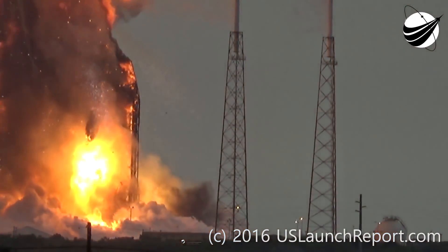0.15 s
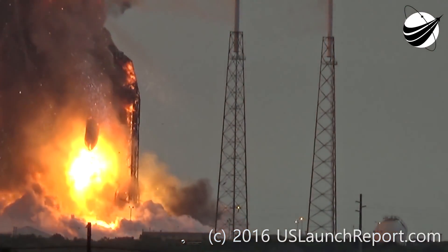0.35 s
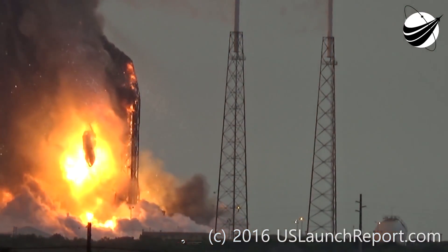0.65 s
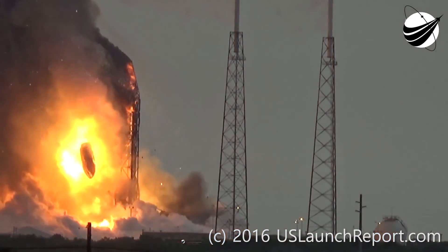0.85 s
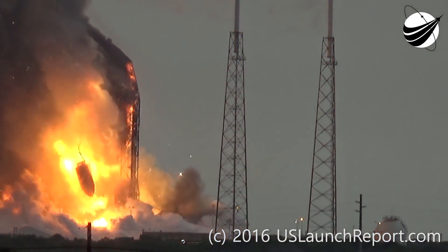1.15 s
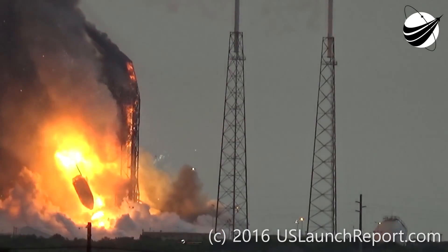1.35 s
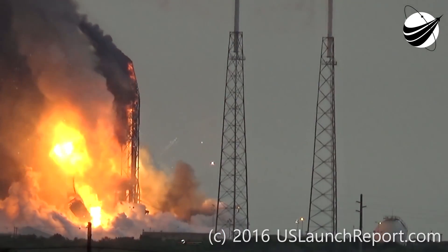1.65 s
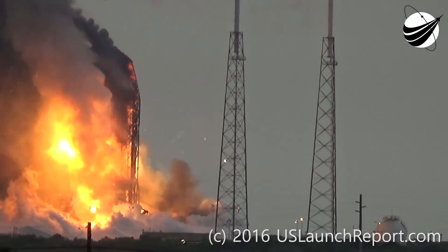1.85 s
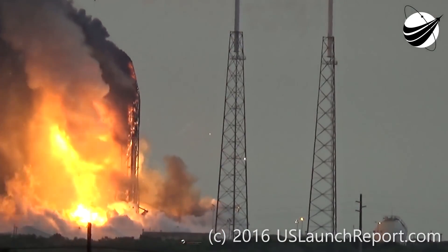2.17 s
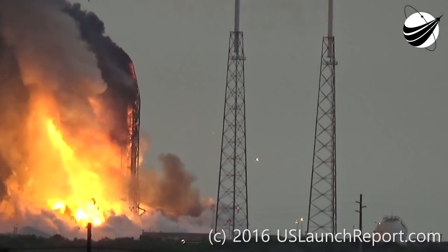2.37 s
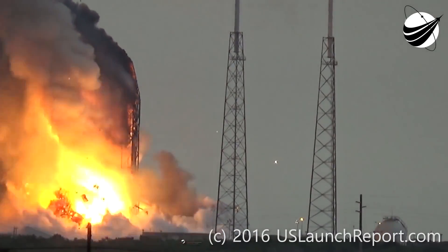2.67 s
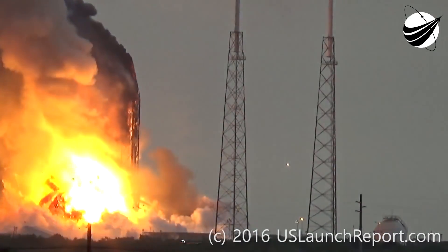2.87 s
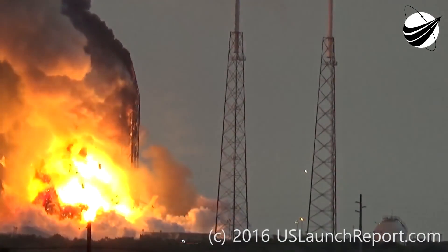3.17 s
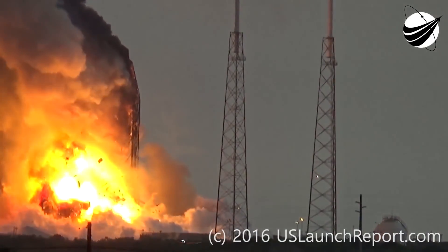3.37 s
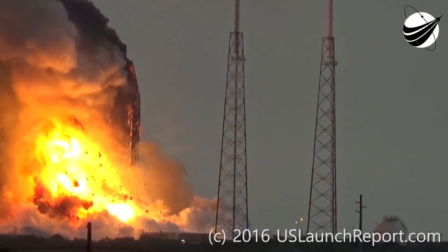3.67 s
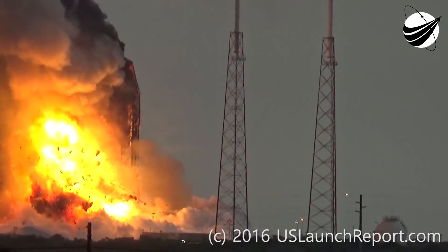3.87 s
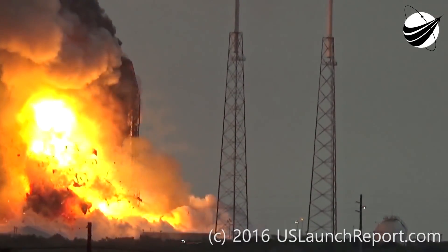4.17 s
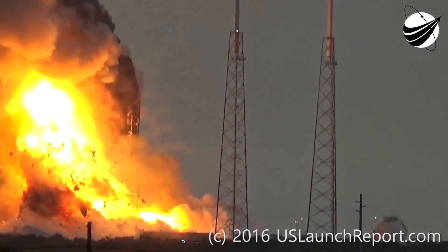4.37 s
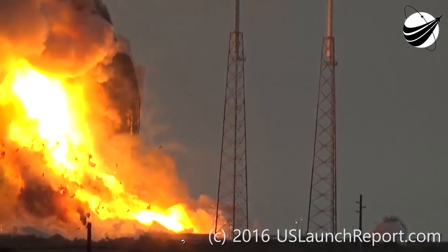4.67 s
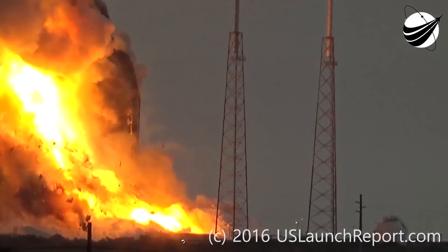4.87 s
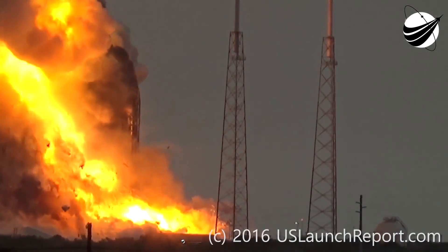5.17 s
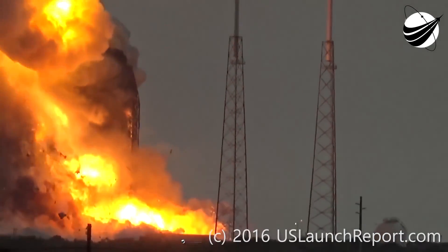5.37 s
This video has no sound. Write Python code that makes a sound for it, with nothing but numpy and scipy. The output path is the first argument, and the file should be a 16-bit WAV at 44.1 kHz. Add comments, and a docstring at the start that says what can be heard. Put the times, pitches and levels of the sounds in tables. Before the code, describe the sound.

The sound starts in mid-roar: heavy low booms and puffs from a distant burning rocket, easing into uneven rumbling. Three explosions snap out, the middle one brightest, each trailing rough noisy echoes. Between them the fire keeps rolling. Quiet hiss, light ticking, a short rough animal-like squawk and thin insect bands lie close to a small camera microphone outdoors, which distorts at the peaks.

```python
"""Far fuel fire with blasts

A far fuel fire rolls, booms and puffs (shaped noise) across flat open ground, with sharp blasts (pressure
jumps) and their bright echoes (swelling noise). The sound grazes the ground on its way to a two-port camera
microphone, whose level dips and whose input overloads. Nearby, insects hiss (bands of noise), the camera
motor likely ticks (short tones), a few blips sound and something squawks once (rough tone through a throat)."""
import sys
import numpy as np
from scipy import signal
from scipy.fft import rfft, irfft, next_fast_len
from scipy.io import wavfile
from scipy.ndimage import uniform_filter1d

SR = 44100
rng = np.random.default_rng(int(sys.argv[2]) if len(sys.argv) > 2 else 0)


def inscribe(sig):
    """Save sig as 16-bit PCM at rate SR to the path in sys.argv[1].

    A 1-D sig is mono; a 2-D sig holds one channel per row.
    Samples are clipped to [-1, 1] before scaling.
    """
    pcm = np.round(np.clip(np.atleast_2d(sig).T, -1, 1) * 32767)
    wavfile.write(sys.argv[1], SR, pcm.astype(np.int16))


N = 243873  # samples in the scene


def fire():
    """Turbulent burning: three ranges of eddy size, the finest made lumpy by small pops."""
    # Noise colours, from the deep roll up to the rattle near 1 kHz. Each row: frequency in Hz, dB per Hz.
    deep_colour = [(15, -56), (25, -39.5), (52, -42), (70, -24.5), (100, -14.5), (127, -3), (155, 1.5),
                   (178, -2), (198, -1.5), (220, -6.5), (247, -24.5), (270, -26.5), (350, -49), (590, -120)]
    upper_colour = [(60, -52), (150, -15), (250, -10), (312, -2.5), (413, 2), (483, -6), (532, -23.5),
                    (560, -16.5), (730, -23), (1230, -120)]
    rattle_colour = [(100, -37), (320, 3.5), (540, -3), (739, 4), (823, -0.5), (899, -2.5), (975, -8.5),
                     (1070, -9.5), (1130, -15), (1220, -10.5), (1310, -25.5), (1350, -18), (1760, -25),
                     (2970, -120)]
    # Slow air pressure of the big rolls. Each row: frequency in Hz, dB per Hz.
    push_colour = [(10, -36), (20, 2), (35, 4), (52, -1), (70, -5.5), (100, -30), (300, -100)]
    # Steady burning under the booms. Each row: time in seconds, then deep roll, upper roll and rattle in dB.
    burning = [(0, -14, -17, -36), (.5, -34, -26.5, -39), (1.8, -30, -31, -41), (2.4, -27, -21, -37),
               (3.3, -32, -25.5, -32.5), (4.1, -32, -28, -35.5), (4.7, -28, -27.5, -38),
               (5.53, -29.5, -34, -39.5)]
    # Booms of the fireball. Each row: time of the top, rise and fall in seconds (each spans 20 dB),
    # then deep roll, upper roll and rattle at the top in dB.
    booms = [ (0.063, 0.022, .06, -15, -11, -32.5), (0.091, .05, 0.13, -4, -18, -26),
             (0.141, 0.031, 0.15, -8, -10.5, -29.5), (.21, .1, 0.054, -12, -32, -30),
             (.283, .08, 0.15, -17.5, -32, -33.5), (0.379, 0.034, 0.28, -4.5, -12.5, -27.5),
             (.43, 0.12, 0.25, -12.5, -18.5, -37.5), (0.664, .12, 0.37, -8.5, -18, -30.5),
             (.88, 0.04, 0.23, -16, -25, -41), (1.118, 0.16, 0.11, -12, -21, -41),
             (1.207, 0.036, 0.2, -11.5, -22, -36), (1.29, 0.11, 0.15, -12.5, -23.5, -53),
             (1.47, 0.22, 0.043, -12, -19, -40), (1.59, 0.2, .3, -20, -26, -43),
             (1.74, 0.23, 0.041, -14, -39, -43), (1.8, 0.044, 0.14, -19, -21, -38),
             (1.865, 0.13, .1, -20.5, -25, -49), (1.925, .05, 0.27, -12.5, -23.5, -38),
             (2.04, 0.18, 0.19, -13.5, -22.5, -50), (2.078, .015, 0.054, -5, -11.5, -34),
             (2.09, .012, 0.29, -6, -8.5, -14.5), (2.19, 0.15, 0.047, -14, -11, -32),
             (2.258, 0.029, 0.076, -16, -23, -32), (2.396, 0.082, 0.35, -9, -20, -28),
             (2.552, 0.22, 0.069, -12.5, -18, -46), (2.665, .012, 0.33, -7.5, -9, -14.5),
             (2.76, 0.13, 0.27, -9, -13.5, -29), (2.835, 0.17, 0.16, -7, -14.5, -20.5),
             (2.95, .2, 0.6, -13.5, -20.5, -24.5), (3.06, 0.14, 0.23, -15, -26, -37),
             (3.17, 0.1, 0.048, -15, -37, -39), (3.255, 0.029, 0.19, -21, -26.5, -34),
             (3.44, 0.13, 0.084, -19, -25.5, -43), (3.527, 0.12, 0.048, -15, -28, -32),
             (3.671, 0.11, 0.13, -16.5, -32, -31), (3.849, .11, 0.25, -17, -25.5, -35),
             (4.081, 0.12, 0.074, -12.5, -17.5, -30.5), (4.195, 0.18, 0.094, -18.5, -24.5, -34),
             (4.224, .005, 0.17, -4.5, -8, -13.5), (4.325, 0.041, 0.49, -6, -9, -21),
             (4.479, 0.048, 0.28, -8, -15, -23.5), (4.759, 0.3, 0.022, -14, -24.5, -38),
             (4.827, 0.028, 0.39, -15.5, -26, -33.5), (4.915, 0.15, 0.38, -13, -17, -32.5),
             (5.103, 0.097, 0.16, -12, -21.5, -35.5), (5.17, 0.087, 0.053, -26, -18, -46),
             (5.215, 0.023, 0.21, -20, -33, -38.5), (5.27, 0.097, 0.47, -17.5, -22.5, -50),
             (5.445, 0.043, 0.16, -18, -21, -31.5)]
    levels_db = []
    for bed_db, boom_db in zip(follow(burning), swells_db(booms)):
        levels_db.append(10 * np.log10(amp(2 * bed_db) + amp(2 * boom_db)))  # the powers add
    deep_db, upper_db, rattle_db = levels_db
    deep = amp(deep_db) * steadied(noise(deep_colour), 970, 0.42)
    upper = amp(upper_db) * steadied(noise(upper_colour), 1100, 0.16)
    push = amp(1.85 * upper_db - 9.5) * noise(push_colour)  # grows faster than the upper roll
    rattle = amp(rattle_db + 1.06 * lumps()) * walled(noise(rattle_colour))
    return deep + upper + push + rattle


def blasts():
    """Each front is a jump that swings negative, torn by turbulent air into a few milliseconds of crack."""
    # Shock fronts before colouring. Each row: start in seconds, peak in dB, time to swing negative in ms,
    # crack level in dB over the front, crack length in ms, upper treble edge in Hz.
    shocks = [(2.081, -11, 1.1, -9, 3.5, 6000), (2.085, -1.5, 0.39, -12.5, 5.5, 4020),
              (2.091, -7.5, 1.4, 0.5, 6.2, 4400), (2.246, -20, 1.2, -12, 6.7, 2500),
              (2.391, -39, 1.1, -9, 9.2, 2000), (2.6602, -8.5, 2.3, 1.5, 4.7, 5000),
              (2.667, 3.5, 0.57, -7, 3.3, 9200), (4.222, -5, 0.81, -16.5, 3, 1500),
              (4.233, -22.5, 0.91, -2, 9.5, 2500), (4.238, -2.5, 1.2, -11.5, 8.2, 3470),
              (4.241, -13.5, 0.7, -10, 17, 3900), (4.252, -14.5, 1.1, -4, 2, 6000),
              (4.309, -15.5, 0.59, -10, 7.4, 1800), (4.325, 0, 1.3, -17.5, 4.5, 3450),
              (4.328, -6, 0.68, -16, 3.3, 4500)]
    # Colour given by ground and camera body. Each row: frequency in Hz, gain in dB.
    front_colour = [(30, 1.5), (150, 16.5), (260, -3.5), (400, 2), (1000, 4), (2000, 3), (3000, -9.5),
                    (5000, -12.5), (6500, -33), (9500, -10), (15000, -39)]
    t = np.arange(2048) / SR
    shared, own = np.zeros(N), np.zeros(N)
    for s, db, ms, crack_db, crack_ms, edge_hz in shocks:
        u = t / (ms / 1000)
        jump = (1 - u) * np.exp(-u)
        front = signal.lfilter(*signal.butter(2, edge_hz, fs=SR), jump)  # distance rounds the jump
        crack_band = signal.butter(2, [900, edge_hz], "band", fs=SR)
        grit = evened(signal.lfilter(*crack_band, rng.standard_normal((2, len(t)))))
        grit = grit * amp(crack_db) * np.exp(-(t / (crack_ms / 1000)) ** 2)
        start = round(s * SR)
        at = slice(start, start + len(t))
        shared[at] += amp(db) * (front + grit[0])
        own[at] += amp(db) * 0.33 * grit[1]
    # A filter whose phase follows from its gain, so that nothing rings before the front.
    log_gain = np.log(amp(read(front_colour, abs(np.fft.fftfreq(8192, 1 / SR)))))
    causal = np.fft.ifft(np.exp(log_gain - 1j * signal.hilbert(log_gain).imag)).real[:4096]
    shared, own = (signal.oaconvolve(x, causal)[:N] for x in (shared, own))
    return ports(shared, own, np.zeros_like)


def puffs_and_echoes():
    """Swells of noise: early puffs with the booms, then echoes of the blasts; sizzle dies faster than fizz."""
    # Noise colours of the fizz and of the brighter sizzle. Each row: frequency in Hz, dB per Hz.
    fizz_colour = [(200, -28), (740, 5), (1250, 6.5), (1330, -1), (1430, 3), (1480, 3), (1580, 6.5),
                   (1720, 2.5), (1900, 6), (2540, -8.5), (3620, -8), (5070, -19), (5500, -31), (6300, -39),
                   (8190, -61), (13900, -120)]
    sizzle_colour = [(1800, -25), (2600, 14.5), (3600, 11.5), (5000, 5.5), (6300, -6), (8300, -2),
                     (11500, -6.5), (14200, -21), (15500, -26)]
    # Puffs and echoes. Each row: time of the top, fizz rise and fall in seconds
    # (each spans 20 dB), fizz level in dB, dB added for the sizzle.
    swell_rows = [(.085, .04, 0.089, -39, -17), (.148, .04, 0.18, -44, -15), (.39, 0.056, 0.12, -42, -15),
                  (.67, .1, 0.23, -52, -15), (2.1, 0.017, 0.18, -24, -24), (2.146, 0.062, 0.43, -26.5, -26),
                  (2.516, .04, 0.095, -40.5, -17), (2.688, 0.021, 0.15, -17, -5.5),
                  (2.745, 0.057, 0.036, -17, -11), (2.81, 0.086, 0.35, -25, -1),
                  (2.86, 0.081, 0.2, -26, -3.5), (2.915, .08, 0.17, -29, -11.5),
                  (2.99, 0.099, 0.077, -32.5, -6.5), (3.054, 0.079, 1, -33, -14),
                  (3.398, 0.17, 3.7, -42, -14), (4.0, .05, .15, -41.5, -10), (4.055, 0.054, 0.61, -39, 3),
                  (4.245, 0.042, .15, -39, -15), (4.275, .04, .08, -38, -14), (4.31, .06, .04, -31, -14),
                  (4.345, 0.035, 0.21, -34, -14), (4.4, .05, .15, -41, -12), (4.49, 0.056, 0.24, -44, -10),
                  (4.593, 0.028, 0.24, -49.5, -9)]
    s, rise, fall, db, treble_db = np.transpose(swell_rows)
    faster = 1.27  # how much more steeply the sizzle moves, in dB per dB of fizz
    fizz_db, = swells_db(np.transpose([s, rise, fall, db]))
    sizzle_rows = np.transpose([s, rise / faster, fall / faster, faster * db + treble_db])
    sizzle_db, = swells_db(sizzle_rows)
    lumps_db = 1.08 * lumps()
    fizz = amp(fizz_db + lumps_db) * walled(noise(fizz_colour))
    sizzle = amp(sizzle_db + faster * lumps_db) * noise(sizzle_colour)
    return fizz + sizzle


def chorus():
    """Many far insects blur into three wavering bands of hiss; the lowest has a faint band far above it."""
    # Each row: time in seconds, then the bands near 4.7, 9.3 and 10.6 kHz in dB.
    band_levels = [(0, -61, -60, -66), (.76, -61, -62.5, -68), (1.38, -57, -60, -70),
                   (2.05, -62.5, -63, -68), (3.3, -61, -66, -66), (4.2, -53, -54.5, -60.5),
                   (4.45, -50.5, -54, -56), (4.78, -47.5, -57, -58), (4.89, -56.5, -55.5, -53.5),
                   (5.4, -49, -53.5, -59), (5.53, -59, -54, -52)]
    low_db, middle_db, high_db = (db + 1.2 * lumps(span=4000) for db in follow(band_levels))
    a, b, c, d, e, f = rng.standard_normal((6, N))
    # Left and right share much of their noise, but not all of it.
    low = np.array([band(x, 4660, 650) for x in (a + 0.53 * b, a - 0.29 * b)])
    low = low + amp(-13) * band(e, 13600, 1200)
    middle = np.array([band(x, 9270, 1300) for x in (c + 0.25 * f, c - 0.25 * f)])
    high = band(d, 10660, 1500)
    return amp(low_db) * low + amp(middle_db) * middle + amp(high_db) * high


def ticks():
    """Each tick, likely of the camera motor, is a few milliseconds of a soft-edged tone varied by chance."""
    # Single ticks. Each row: start in seconds, typical peak in dB.
    single_ticks = [(.0189, -47), (.0528, -52), (.2528, -48), (.4529, -51), (1.1233, -37.5), (1.1907, -39),
                    (1.5873, -46), (1.807, -39), (1.8392, -33)]
    # Runs of evenly spaced ticks. Each row: first and last start in seconds, typical peak in dB.
    tick_runs = [(0.218, .3529, -42.5), (0.485, .686, -45), (1.0857, 1.553, -43.5), (4.691, 5.49, -43.5)]
    step_s, spread_db = .0666, 1.
    typical_hz, top_s = 3290, .0018  # top_s: time from the start to the loudest point
    rows = list(single_ticks)
    for first, last, db in tick_runs:
        rows += [(s, db) for s in np.arange(first, last + step_s / 2, step_s)]
    t = np.arange(900) / SR
    shape = (t / top_s) * np.exp(1 - t / top_s)
    out = np.zeros(N)
    for (s, db), (detune, vary) in zip(rows, rng.standard_normal((len(rows), 2))):
        tone = np.sin(2 * np.pi * typical_hz * (1 + .02 * detune) * t)
        out[round(s * SR):][:len(t)] += amp(db + spread_db * vary) * shape * tone
    return out * amp([[-.5], [.5]])  # a little louder on the right


def squawk():
    """A rough tone mixed with noise passes through a throat: a quick attack, then a fade."""
    # One row: start in seconds, length in seconds, starting level in dB, typical start and end pitch in Hz.
    call = (.777, .078, -31, 483, 494)
    # Throat resonances. Each row: centre in Hz, width of one pass in Hz, level in dB.
    throat_rows = [(900, 450, 1), (1540, 390, 6), (1910, 450, 5), (2300, 490, 1), (3250, 350, -5),
                   (3870, 300, -12), (2200, 5000, -16)]
    attack_s, fade_db = 0.0056, -9.5
    throb_hz, throb_db = 37, -0.5
    start, length, db, start_hz, end_hz = call
    t = np.arange(0, length, 1 / SR)
    jitter = evened(uniform_filter1d(rng.standard_normal(N), 150))[:len(t)]
    pitch = np.linspace(start_hz, end_hz, len(t)) * (1 + 0.059 * jitter)
    turns = np.cumsum(pitch) / SR
    tone = evened(sum(np.cos(2 * np.pi * k * turns) for k in range(2, 9)))
    folds = tone + 2.4 * rng.standard_normal(N)[:len(t)]
    # Each resonance acts twice.
    throat = sum(amp(d) * resonate(resonate(folds, f, w), f, w) for f, w, d in throat_rows)
    throb = throb_db * np.cos(2 * np.pi * throb_hz * t - 1.2)
    attack = np.minimum(t / attack_s, 1) ** 2
    shape = attack * amp(db + fade_db * t / length + throb) * signal.windows.tukey(len(t), .2)
    out = np.zeros(N)
    out[round(start * SR):][:len(t)] = shape * evened(throat)
    return out * amp([[.3], [-.3]])  # a little louder on the left


def blips():
    """Short soft-edged tones, one of them a thin rising whistle."""
    # Each row: start in seconds, peak in dB, start and end pitch in Hz, length in seconds.
    tones = [(.618, -52, 7300, 7300, .012), (1.795, -48, 11000, 11000, .012),
             (1.836, -39, 2600, 2400, .014), (3.725, -51, 3350, 4750, .1)]
    out = np.zeros(N)
    for s, db, start_hz, end_hz, length in tones:
        hz = np.linspace(start_hz, end_hz, round(length * SR))
        tone = np.sin(2 * np.pi * np.cumsum(hz) / SR)
        out[round(s * SR):][:len(hz)] += amp(db) * signal.windows.tukey(len(hz), .4) * tone
    return out


def hiss():
    """Steady noise of the air and the microphone."""
    # Each row: frequency in Hz, dB per Hz.
    hiss_colour = [(200, -32), (740, -6), (1250, 1), (1290, -3.5), (1480, -1), (1610, -0.5), (2010, 0),
                   (2190, -7), (2430, -4), (2790, -7), (3270, -5), (3520, -7), (4830, -5), (5780, -12.5),
                   (9600, -14.5), (15600, -19.5)]
    return amp(-46.5) * walled(noise(hiss_colour))


def ports(a, b, colour_db):
    """Two unrelated sounds become left and right: alike, balanced and shifted differently at each frequency."""
    # The ports hear alike, except in notches cut by the ground.
    # Each row: frequency in Hz, left-right likeness (1 is identical).
    likeness = [(30, .8), (140, .99), (220, .97), (255, .6), (300, .97), (460, .97), (540, .2), (620, .75),
                (780, .85), (835, .35), (900, .85), (1330, .6), (1600, .97), (2050, .96), (2400, .6),
                (2900, .85), (6000, .82), (9500, .88), (12500, .99)]
    # Balance of the ports. Each row: frequency in Hz, left minus right in dB.
    balance = [(30, -7.5), (90, -10), (200, -6.5), (260, -5), (400, -4), (520, -3), (680, 4), (770, -7),
               (1000, 4.5), (1250, -6), (1390, 6.5), (1500, -0.5), (2000, 0), (2400, -5.5), (2800, 1.5),
               (4200, 0), (15000, 0)]
    # Shift between the ports. Each row: frequency in Hz, lead of left over right in radians.
    left_lead = [(30, -.5), (200, -.33), (245, -.9), (275, .1), (480, -.3), (535, -1.2), (560, 1.4),
                 (650, 1), (700, -.5), (780, -.3), (820, 1.6), (880, 0), (1050, .5), (1500, -.1),
                 (2200, -.6), (2600, .7), (3300, -.1), (5200, -.2), (7000, 0)]
    size = next_fast_len(N)
    hz = np.fft.rfftfreq(size, 1 / SR)
    same = np.clip(read(likeness, hz), 0, 1)
    lean = amp(read(balance, hz))
    turn = np.exp(.5j * read(left_lead, hz))  # half the shift goes to each side
    shared = rfft(a, size) * np.sqrt((1 + same) / 2)
    own = rfft(b, size) * np.sqrt((1 - same) / 2)
    pair = np.array([lean * turn * (shared + own), (shared - own) / turn]) * 2 / (1 + lean)
    return irfft(pair * amp(colour_db(hz)), size)[:, :N]


def noise(spectrum):
    """Noise at both ports, of unit level in their mean."""
    pair = ports(*rng.standard_normal((2, N)), lambda hz: read(spectrum, hz))
    return pair / np.sqrt(np.mean(pair.mean(0) ** 2))


def walled(pair):
    """A surface near the camera repeats steady noise, which combs the spectrum."""
    delay_ms, echo_db = 5.6, -18
    return pair + amp(echo_db) * np.roll(pair, round(delay_ms * SR / 1000), axis=1)


def steadied(pair, span, share):
    """Evens out part of the chance swells that last longer than span samples."""
    power = uniform_filter1d(uniform_filter1d(pair.mean(0) ** 2, int(span)), int(span))
    out = pair / (abs(power) + 0.15) ** (share / 2)
    return out / np.sqrt(np.mean(out.mean(0) ** 2))


def lumps(span=400):
    """Chance that wanders within about span samples."""
    return evened(uniform_filter1d(uniform_filter1d(rng.standard_normal(N), span), span))


def swells_db(rows):
    """Level in dB of swells that rise to a top and fall, their powers summed; one curve per level column."""
    s, rise, fall, *tops_db = np.transpose(rows)
    at = np.arange(0, N + 64, 64)  # one point every 64 samples
    t = at[:, None] / SR - s
    spans_of_20_db = np.where(t < 0, -t / np.maximum(rise, .003), t / np.maximum(fall, .003))
    shape = amp(-40 * spans_of_20_db)  # a power, hence twice 20 dB
    curves = [10 * np.log10(shape @ amp(2 * top_db) + 1e-14) for top_db in tops_db]
    return [np.interp(np.arange(N), at, curve) for curve in curves]


def follow(rows):
    """Each column of a table as a curve over all samples."""
    s, *columns = np.transpose(rows)
    return [np.interp(np.arange(N) / SR, s, c) for c in columns]


def read(points, hz):
    """Reads a table at any frequency, with straight lines over log frequency."""
    f, value = np.transpose(points)
    return np.interp(np.log(hz + 1), np.log(f + 1), value)


def resonate(x, hz, width):
    """Shifts hz down to zero, smooths, shifts back: a resonance of gain 1."""
    turn = np.exp(2j * np.pi * np.cumsum(hz * np.ones(len(x))) / SR)
    r = np.exp(-np.pi * width / SR)
    return 2 * (turn * signal.lfilter([1 - r], [1, -r], x / turn)).real


def band(x, hz, width):
    """A steep fixed resonance, at unit level."""
    peak = signal.iirpeak(hz, hz / width, SR)
    return evened(signal.lfilter(*peak, signal.lfilter(*peak, x)))


def amp(db):
    """Turns dB into a factor of amplitude."""
    return 10 ** (np.asarray(db) / 20)


def evened(x):
    """Scales a sound to unit level."""
    return x / np.sqrt(np.mean(x ** 2) + 1e-20)


def over_db(x, span, knee_db, recovery_db_per_s):
    """How far the smoothed level stands over a knee; quick to rise, slow to recover."""
    power_db = 10 * np.log10(abs(uniform_filter1d((x ** 2).mean(0), int(span))) + 1e-12)
    fall = np.arange(N) * recovery_db_per_s / SR
    held_db = np.maximum.accumulate(power_db + fall) - fall
    return uniform_filter1d(np.maximum(held_db - knee_db, 0), 200)


def scene():
    """The far fire with its blasts, puffs and echoes, then the hiss and the small sounds nearby."""
    far = fire() + blasts() + puffs_and_echoes()
    return far + hiss() + chorus() + ticks() + blips() + squawk()


def record(dry):
    """Gain control dips in the loudest parts; the treble is dulled there; the input saturates; then band limit."""
    treble_filter = signal.firwin(101, 8200, pass_zero=False, fs=SR)
    treble = signal.oaconvolve(dry, treble_filter[None], "same")
    treble_gain = amp(-1.5 * over_db(dry, 500, -6.0, 150.))
    dulled = dry - treble * (1 - treble_gain)
    ducked = dulled / amp(0.62 * over_db(dry, 600, -1.9, 60.))
    knee = .8  # saturation starts here, as a share of full scale
    below = np.clip(ducked, -knee, knee)
    clipped = below + (1 - knee) * np.tanh((ducked - below) / (1 - knee))
    band_limit = signal.firwin(511, 15750, window=("kaiser", 9), fs=SR)  # cuts above 15750 Hz
    return signal.oaconvolve(clipped, band_limit[None], "same")


dry = scene()
out = record(dry)
inscribe(out)
```